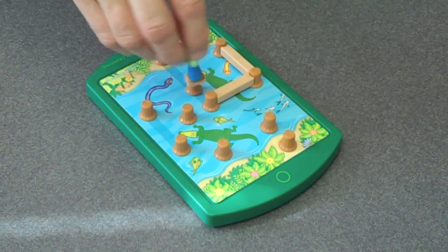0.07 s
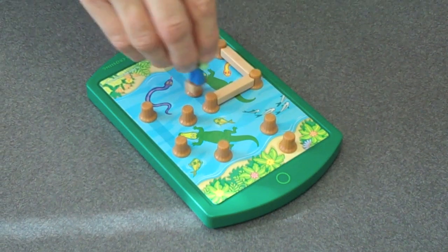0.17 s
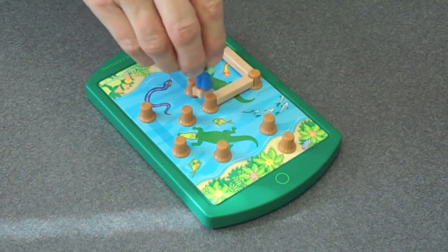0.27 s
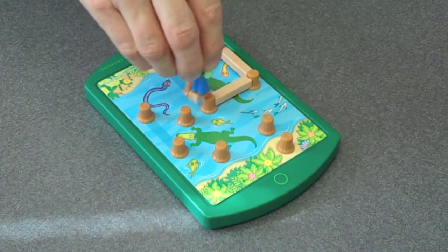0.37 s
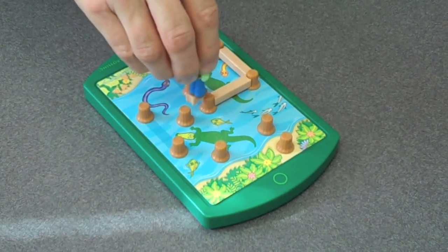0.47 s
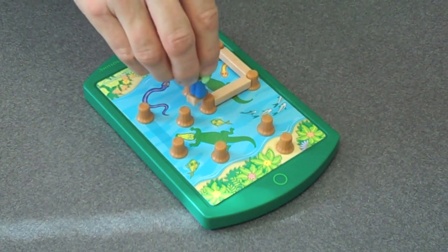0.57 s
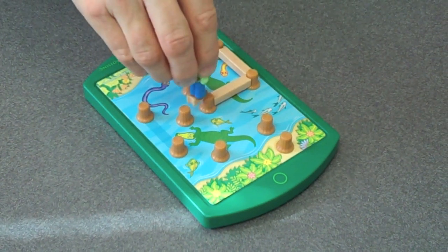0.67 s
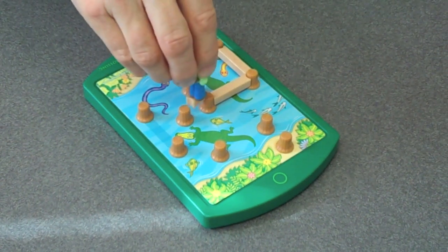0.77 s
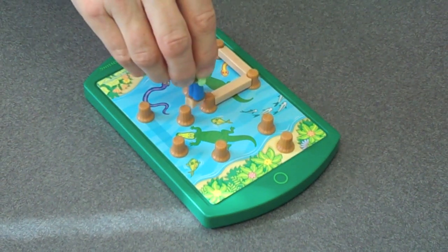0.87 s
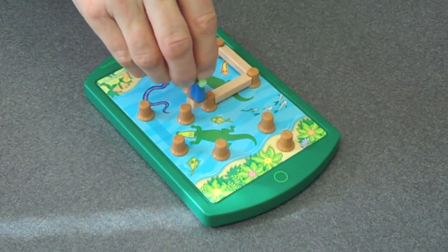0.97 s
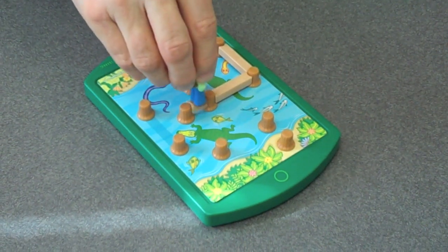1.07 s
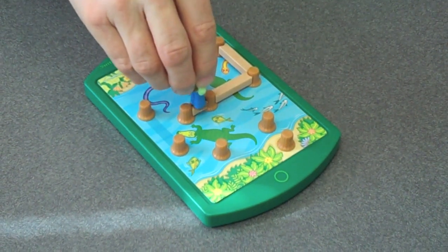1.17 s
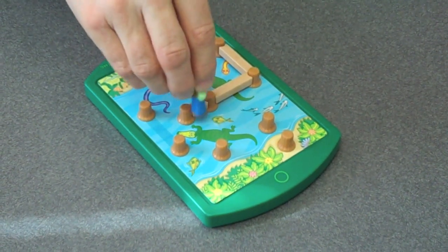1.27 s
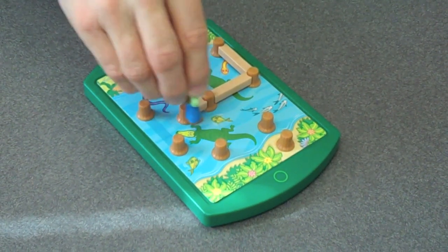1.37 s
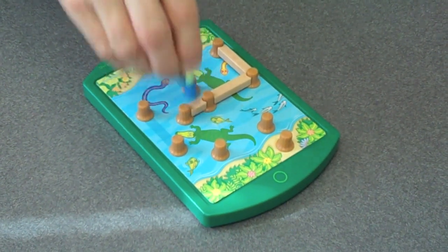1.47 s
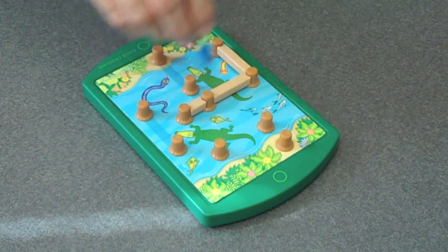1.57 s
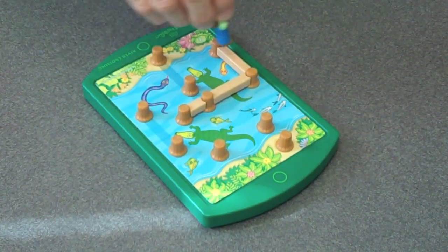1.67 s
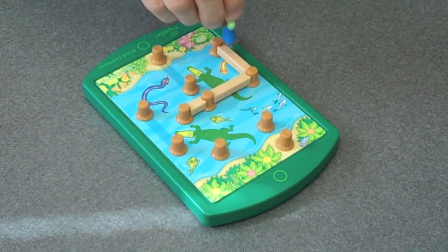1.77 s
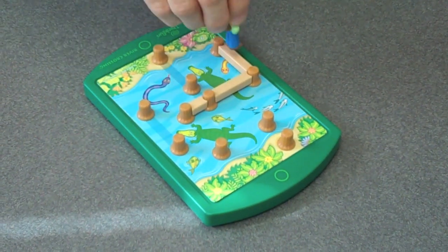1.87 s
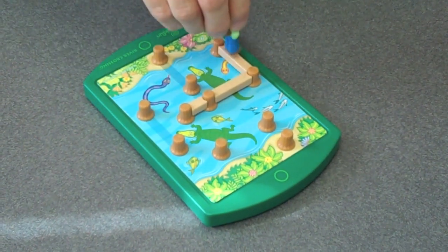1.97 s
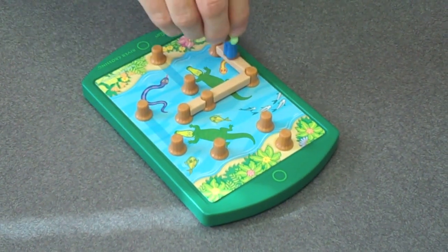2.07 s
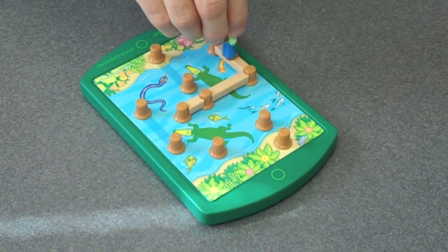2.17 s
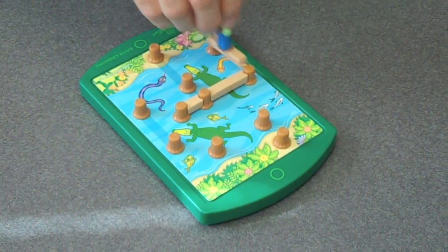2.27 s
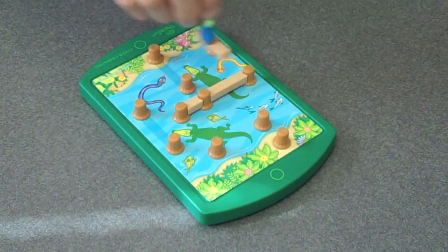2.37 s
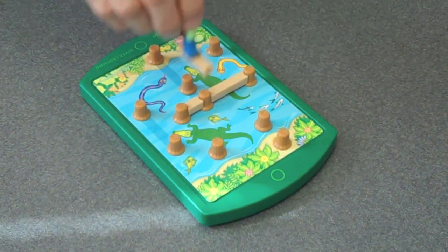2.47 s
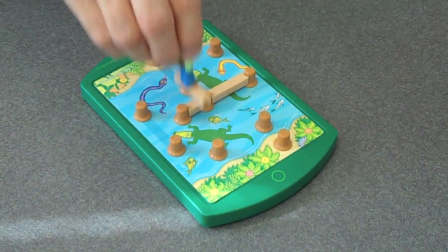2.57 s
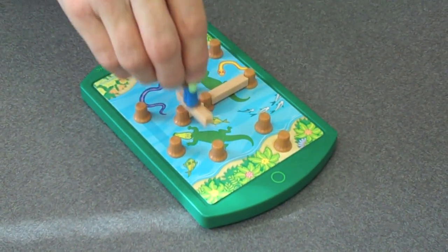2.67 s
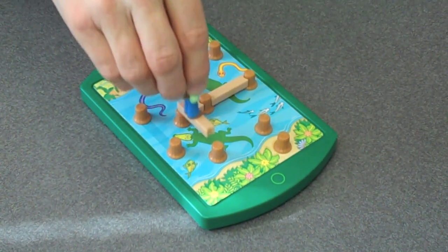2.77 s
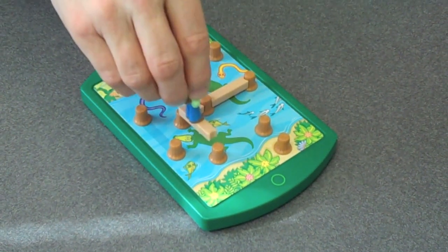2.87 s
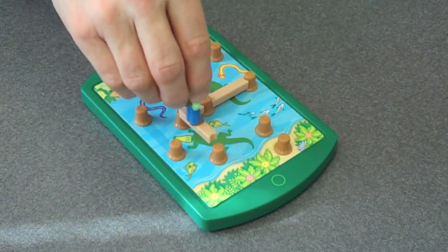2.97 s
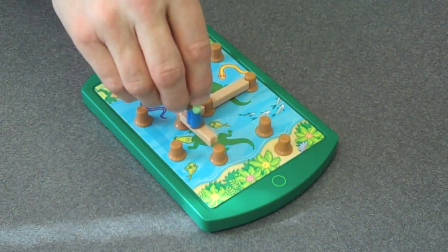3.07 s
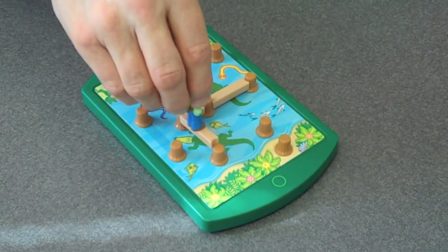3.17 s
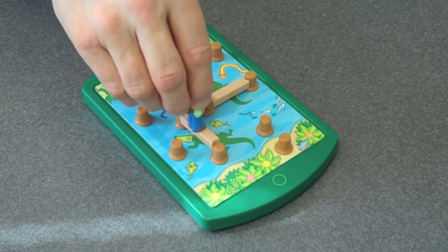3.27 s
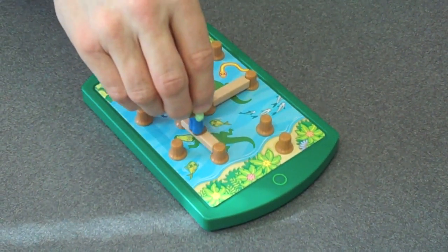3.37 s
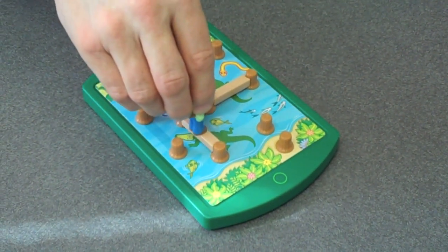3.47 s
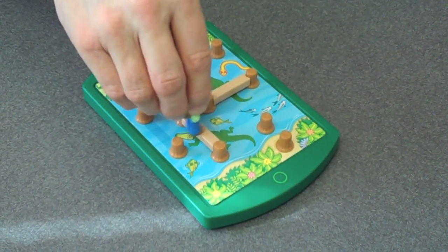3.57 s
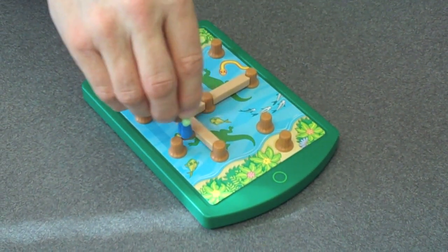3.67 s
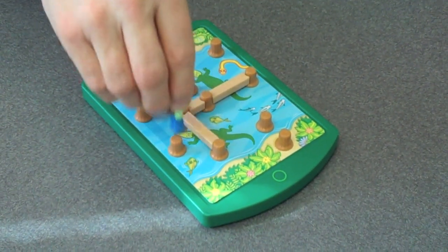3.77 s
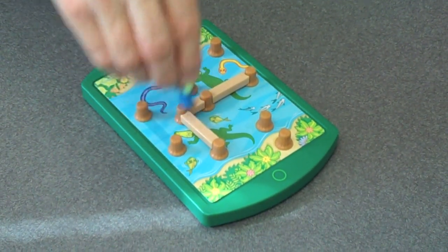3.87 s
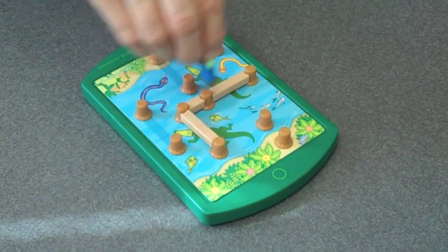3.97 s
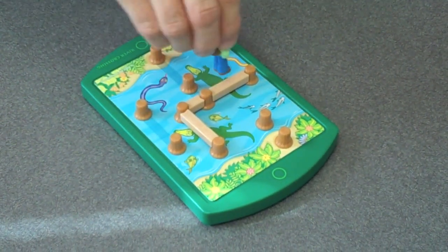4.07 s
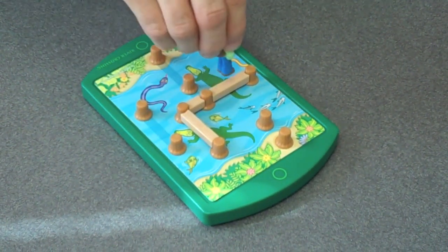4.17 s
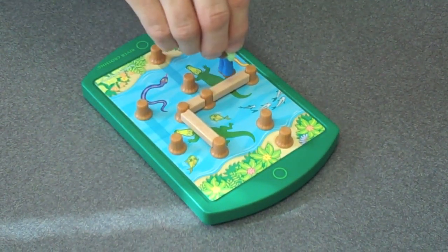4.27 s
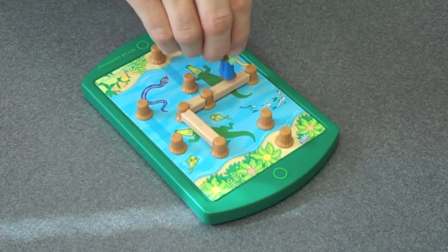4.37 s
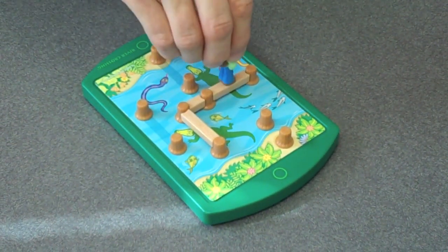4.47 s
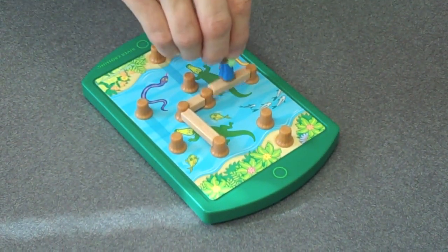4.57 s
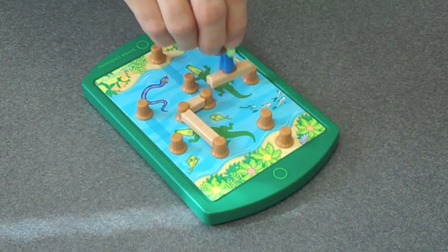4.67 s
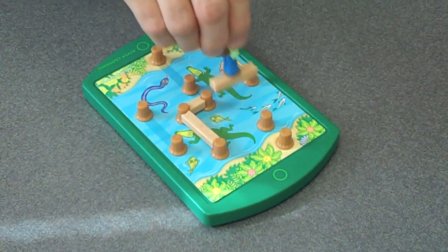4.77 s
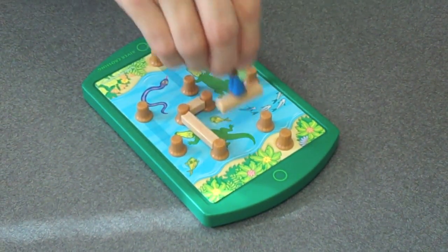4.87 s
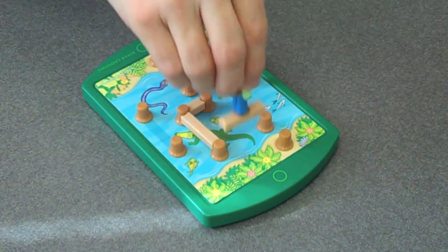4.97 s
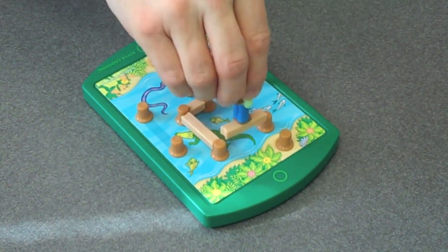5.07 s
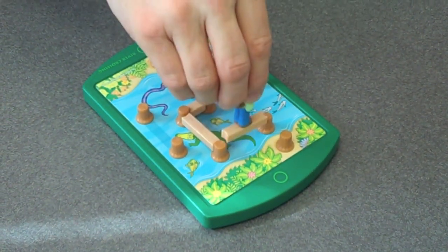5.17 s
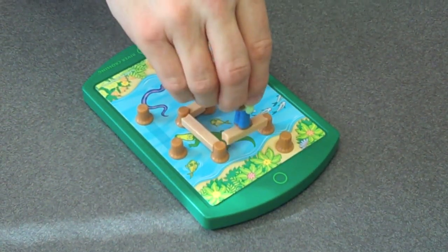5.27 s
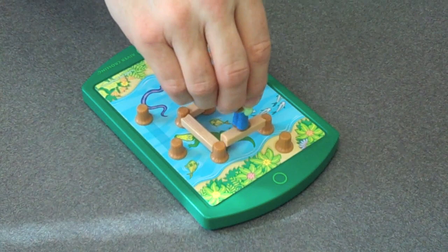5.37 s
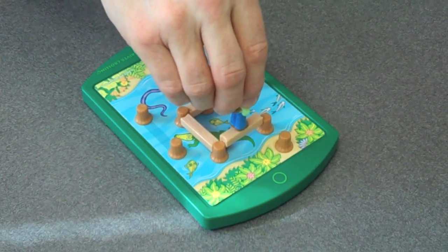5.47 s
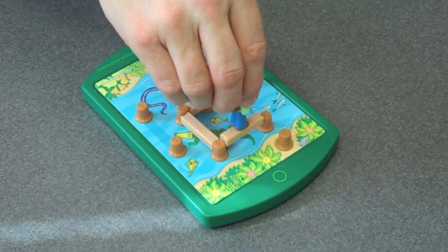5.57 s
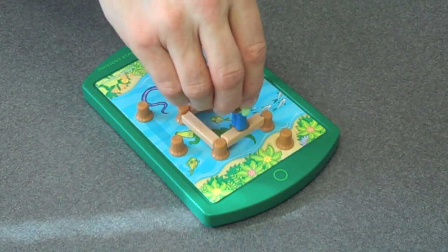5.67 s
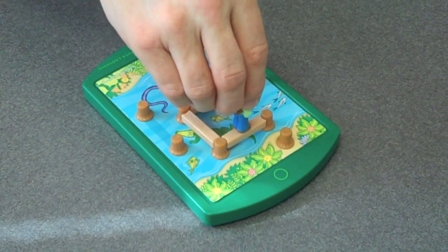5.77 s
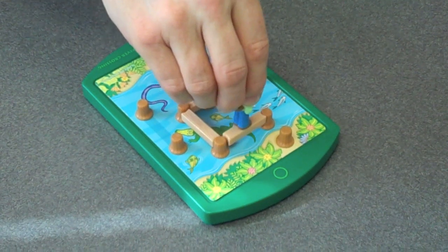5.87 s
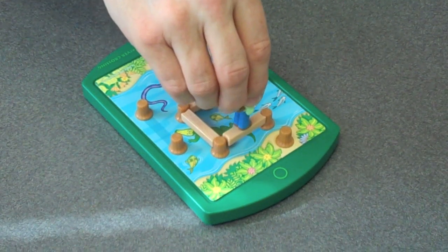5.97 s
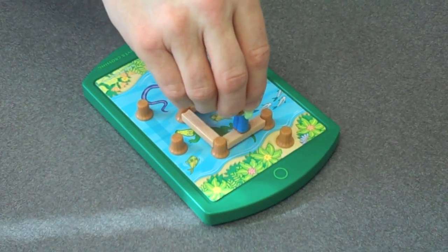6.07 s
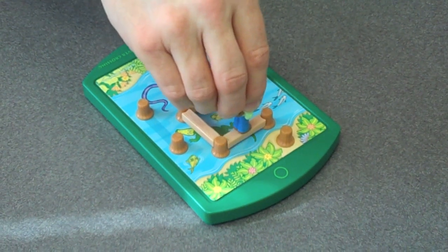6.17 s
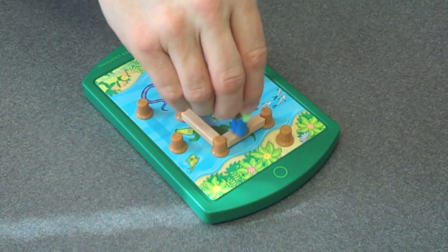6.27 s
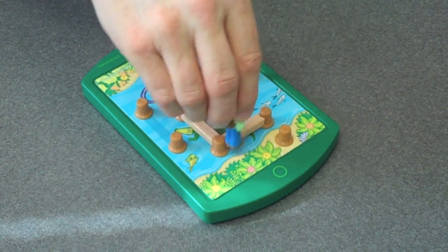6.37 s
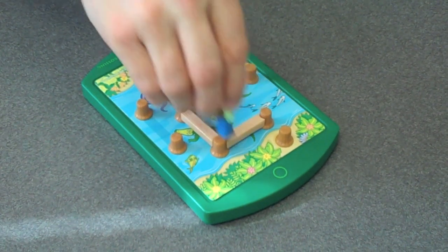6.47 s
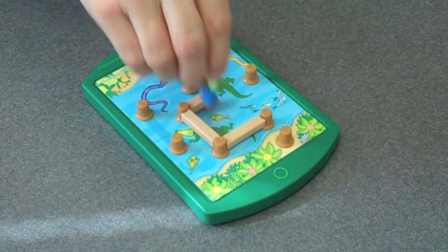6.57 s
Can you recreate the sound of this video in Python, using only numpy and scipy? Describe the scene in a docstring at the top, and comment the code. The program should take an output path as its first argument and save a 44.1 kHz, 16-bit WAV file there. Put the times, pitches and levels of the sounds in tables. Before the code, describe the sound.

A quiet room with a soft, steady ventilation-like rumble, low droning and faint hiss; a close stereo microphone hears a small hollow plastic board. Very faint rubbing begins around 0.5 s, then a crisp click at 1.07 s and a scrapy knock at 1.23 s with tiny trailing ticks. At 2.02 s a loud, hard snap cracks with rapid chatter and a bright, very high ring that dies almost at once; a short scrape and clustered clacks follow at 2.2 s. Light rubs start near 3.15 s, leading to hollow double knocks at 3.55-3.6 s and a smaller one at 3.7 s. A second bright snap strikes at 4.4 s, then a dull scrape and tap at 4.55 s. A light tap comes at 5.34 s, faint rubs and ticks from 5.7 to 6.1 s, and firmer clicks around 6.26-6.3 s, leaving only room noise.

```python
"""Plastic plank puzzle

A hand moves little plastic planks between the pegs of a hollow plastic puzzle board in a quiet room.
Planks rub along the pegs as trains of tiny slips that drive the board's modes, with fine friction on top.
They knock into their seats as damped board modes plus edge clicks of filtered noise.
Twice one snaps up against the playing figure: noise cracks, board knocks and a bright ring of close modes.
Shaped noise lies underneath as a soft ventilation-like rumble with droning resonances and a faint hiss."""
import sys
import numpy as np
from scipy import signal
from scipy.fft import rfft, irfft, next_fast_len
from scipy.io import wavfile
from scipy.ndimage import uniform_filter1d, minimum_filter1d

SR = 44100
rng = np.random.default_rng(int(sys.argv[2]) if len(sys.argv) > 2 else 0)


def transcribe(u):
    """Save the signal u as a 16-bit wav file named by the first command-line argument.

    u: samples, shape (n,) or (channels, n), limited to [-1, 1]; the rate is SR.
    q: integer samples, one column per channel.
    """
    v = np.clip(np.atleast_2d(u).T, -1, 1)
    q = np.round(v * 32767).astype(np.int16)
    wavfile.write(sys.argv[1], SR, q)


N = 292383

# All levels in the tables are relative, before the layer gains.
# Background noise colours: (f/Hz, level per Hz/dB)
RUMBLE = [(12, -30), (20, 2.5), (41, -2.5), (60, -15.5), (75, -11), (108, 0), (168, -6), (233, -4),
          (329, -9.5), (400, -0.5), (456, -8.5), (487, -10), (612, -13), (653, -12.5), (1000, -13),
          (1300, -45.5), (2200, -120)]
HISS = [(590, -33), (1000, -5.5), (1120, -4.5), (1150, -2.5), (1590, -8), (1880, -7), (2210, -9),
        (2530, -7), (3370, -12), (5600, -11), (7300, -6.5), (8420, -15.5), (14000, -17)]
# Droning resonances in the rumble: (f/Hz, width/Hz, level/dB)
DRONE = [(30, 10, -70.5), (115.9, 30, -72.5), (194.6, 33, -69), (231.5, 16, -69), (410, 32, -74)]
# Background stereo image: (f/Hz, left-right likeness, below 0 taken as 0) and (f/Hz, left over right/dB)
LIKENESS = [(60, 0.97), (130, 0.9), (290, 0.84), (640, 0.75), (1400, 0.36), (3080, -0.13), (6780, -0.16),
            (14900, 0.08)]
LEAN = [(60, -12), (130, -1.5), (290, -1.5), (640, 2), (1400, 2.5), (3080, 0), (6780, 1), (14900, 0.5)]
# Hollow board with its pegs, the panel's own mode first: (f/Hz, level/dB, t60/s)
BOARD = [(1103, -10, .06), (630, -24.5, 0.0073), (800, -19.5, .02), (1189, -16, .018), (1560, -17, .018),
         (1651.5, -12.5, 0.02507), (1815, -12, 0.01577), (1960, -12.5, .04), (2120, -10.5, 0.019),
         (2310, -8.5, 0.019), (2601, -9, 0.015), (2790, -7, 0.017), (2984, -5.5, 0.017), (3126, -13, 0.022),
         (3292, -15, 0.016), (3463, -11.5, .022), (3680, -16, 0.022), (4560, -18, 0.0178)]
# Rubs along a peg, each at a spot that sets how the board answers: (t of the hardest push/s, rub level/dB,
# swell/s, release/s, squeaky top/dB, hollow panel/dB, board tilt/dB per octave, favoured f/Hz)
STROKES = [ (0.61, -64, 0.14, .05, -12, -3, 0.5, 2140), (0.72, -62.5, .05, 0.037, -2, -4, -8, 2800),
           (0.92, -59.5, 0.045, 0.015, -17, 5, 3, 3000), (1.074, -50, .03, 0.063, 0, -7, -6, 1720),
           (1.186, -57, 0.015, 0.03, -16, 8, -15, 3000), (1.234, -37.5, 0.039, 0.034, -9, -0.5, -2.5, 3000),
           (2.02, -39, 0.011, .005, -12, -12, 3.5, 2550), (2.209, -33, 0.05, 0.032, -16, -10, 1.5, 1900),
           (3.166, -51.5, 0.014, 0.014, -10, -14, -4, 2900), (3.295, -52, 0.11, 0.045, -8, 1.5, -2, 3060),
           (3.352, -55.5, 0.057, .035, 5, 7, -8, 1650), (3.545, -46.5, 0.0099, 0.078, -7, 1, 4.5, 2830),
           (3.593, -45.5, 0.06, 0.045, 1.5, 2.5, 0, 3100), (3.706, -49.5, 0.024, 0.038, 2, -10, -5, 1660),
           (4.396, -32, .012, 0.024, -3, -19, 3.5, 1750), (4.568, -35.5, 0.021, 0.027, -15, -9, 4, 1950),
           (5.346, -53.5, 0.012, .045, -5, -18, -1.5, 2390), (5.725, -60, 0.045, 0.027, -13, -4, -3, 2395),
           (5.825, -61.5, 0.048, 0.053, -12, -4, -1.5, 2220), (5.98, -54, 0.054, 0.064, -1.5, 1.5, 0, 2240),
           (6.06, -57.5, 0.042, 0.048, 8.5, -3.5, -1.5, 2820), (6.205, -60, 0.059, .1, -5, 7, -1.5, 2900),
           (6.267, -41, 0.0085, 0.02, -6.5, -6, -3, 1590), (6.297, -41, 0.042, 0.03, -10, -4.5, -10, 1650)]
# Fine friction of the edges: (f/Hz, level per Hz/dB)
FRICTION = [(500, 0.5), (2000, -1.5), (3700, -2.5), (4500, -3.5), (5100, -7.5), (6000, 3), (6800, -5.5),
            (7900, 2), (8400, -7), (9100, -14.5), (9800, -9.5), (11000, -37), (14000, -26.5)]
# Room tail: (f/Hz, t60/s) and (f/Hz, reflected level/dB)
ROOM_T60 = [(500, 0.34), (2000, 0.2), (4000, 0.26), (6000, 0.3159), (8000, 0.3969), (10000, 0.31),
            (14000, 0.26)]
ROOM_COLOUR = [(500, 10), (1200, 7.5), (2000, 9), (3200, 3.5), (4300, 2), (6000, -1), (8000, -5.5),
               (9000, -7), (14000, -16.5)]
# Plank touches peg or board: (t/s, board knock/dB, edge click/dB, click centre f/Hz)
CONTACTS = [ (0.542, -41.5, -53.5, 4960), (1.059, -55, -51, 4400), (1.073, -35, -27, 4970),
            (1.232, -32, -39.5, 5200), (1.241, -44, -42.5, 5700), (1.299, -56, -49.5, 6500),
            (1.339, -62, -57.5, 7000), (2.188, -34.5, -54, 6000), (2.201, -29.5, -43, 6000),
            (2.2197, -34.5, -30.5, 5740), (3.164, -54, -67.5, 6000), (3.338, -58, -44, 6900),
            (3.5455, -27.5, -40.5, 7000), (3.570, -35, -53, 5540), (3.582, -33.5, -47, 6500),
            (3.594, -35.5, -29, 6000), (3.695, -42, -50, 6000), (3.703, -36, -47, 5570),
            (3.758, -54, -44, 7300), (4.388, -26.5, -32, 6000), (4.54, -48, -65, 6000),
            (4.5541, -36, -60, 6100), (4.566, -53, -54, 5860), (5.277, -55.5, -72, 5000),
            (5.3392, -38, -48, 5500), (5.803, -46, -66, 4970), (5.972, -49, -56, 6000),
            (6.038, -44, -62, 6000), (6.055, -50, -38.5, 6460), (6.067, -43, -38, 6650),
            (6.262, -33.5, -33, 7300), (6.285, -35.5, -44, 7080), (6.299, -43, -52, 5500),
            (6.354, -58, -55.5, 6560)]
# Plank snaps against the figure and chatters: (t/s, ring/dB, ring f/Hz, chatter/s, crack/dB, board knock/dB)
SNAPS = [(2.0218, -14.5, 8033, .0145, -12.5, -21.5), (4.3955, -12.5, 7835, 0.0095, -13, -24.5)]
# Hits of every snap, first touch to last rebound: (t after the first touch/s, crack and knock level/dB)
CHATTER = [(0, -7.5), (.0022, 1.5), (.0062, -12), (0.0133, -18)]
# Close modes of the bright ring, beating together: (offset from the ring f/Hz, level/dB, left over right/dB)
RING_MODES = [(0.5, -1, 17), (-150, -10.5, 7), (-380, -13, 15), (120.5, -12, 15)]
# Dense, quickly damped modes of plank and figure: (f/Hz, level per Hz/dB)
CRACK = [(100, -51.5), (400, -39.5), (1200, -29), (1800, -21.5), (2600, -12), (4200, -13), (5000, -7),
         (5600, -2), (6400, 6), (7100, 2.5), (7900, 2.5), (8500, -5.5), (9750, -6.5), (10500, -31.5),
         (14000, -34)]
# Lingering modes of the small hard pieces: (f/Hz, level/dB, t60/s)
PIECE = [(2477, -35.5, 0.1), (2830, -47, .12), (5370, -37, 0.164), (5900, -36, 0.14), (6050, -36, 0.1156),
         (6860, -27.5, 0.21), (6780, -35, 0.13), (7236, -36.5, .12), (7300, -35, .2), (8150, -31.5, 0.0582),
         (9740, -23.5, 0.09)]

TIME = np.arange(N) / SR
HIT = TIME[:6000]   # time axis of one hit
PADDED = next_fast_len(N, True)
SIDES = np.array([[1], [-1]])   # left, right
SWELL_DB, RELEASE_DB = 22, 21.5   # growth of the rub over the swell time, and its fall over the release time
SHARPEN_DB_PER_S = 36   # the squeak grows as the plank's edge slides home
FAVOUR_DB, FAVOUR_OCTAVES = 6, 0.081   # lift of the modes near the favoured pitch, and its reach
# The bright ring sags while the plank chatters, drops as it settles, then dies freely
RING_SAG_DB_PER_S, SETTLE_S, SETTLE_DB, RING_T60_S = 330.5, 0.0013, 9.5, 0.077
CEILING, CUTOFF_HZ = 0.63, 14400   # limiter ceiling (full scale is 1), and top of the final low-pass


def from_db(db):
    """Decibels to gain."""
    return np.exp(np.asarray(db) * np.log(10) / 20)


def rms_one(x):
    """Scale to unit rms."""
    return x / np.sqrt(np.mean(x ** 2) + 1e-20)


def at_hz(points, hz):
    """Read a table on a log-frequency axis."""
    f, value = np.transpose(points)
    return np.interp(np.log(np.maximum(hz, 1)), np.log(f), value)


def pan(db):
    """Left and right gains for a level difference, with a mean of one."""
    gains = from_db(SIDES * db / 2)
    return gains / gains.mean(axis=0)


def coloured(x, spectrum):
    """Give a noise a spectrum; rms 1."""
    size = next_fast_len(x.shape[-1], True)
    gain = from_db(at_hz(spectrum, np.fft.rfftfreq(size, 1 / SR)))
    shaped = irfft(rfft(x, size) * gain, size)
    return rms_one(shaped[..., :x.shape[-1]])


def resonate(x, hz, width_hz):
    """One two-pole resonance; the wider it is, the faster it dies."""
    r = np.exp(-np.pi * width_hz / SR)   # pole radius
    poles = [1, -2 * r * np.cos(2 * np.pi * hz / SR), r * r]
    return signal.lfilter([1, 0, -1], poles, x) * (1 - r * r) / 2


def low_cut(x, lowest_hz):
    """A small body radiates little bass."""
    return signal.sosfilt(signal.butter(2, lowest_hz, "high", fs=SR, output="sos"), x)


def dying(t60):
    """Envelope of a free vibration."""
    return from_db(-60 * HIT / t60)


def add(track, s, sound):
    """Mix a sound in at a time."""
    start = round(s * SR)
    track[..., start:start + sound.shape[-1]] += sound[..., :N - start]


def wide_noise(width):
    """A short stereo noise, partly different in each ear."""
    mid, side = rng.standard_normal((2, len(HIT)))
    return mid + width * side * SIDES


def background(spectrum):
    """Steady stereo noise, most alike in both ears in the bass; rms 1."""
    hz = np.fft.rfftfreq(PADDED, 1 / SR)
    alike = np.clip(at_hz(LIKENESS, hz), 0, 1)
    mid, side = rfft(rng.standard_normal((2, PADDED)))
    pair = np.sqrt(1 + alike) * mid + np.sqrt(1 - alike) * side * SIDES
    shaped = pair * pan(at_hz(LEAN, hz)) * from_db(at_hz(spectrum, hz))
    return rms_one(irfft(shaped, PADDED)[:, :N])


def ambience(rumble_db=-62.0, hiss_db=-66.5):
    """Low rumble with a few droning resonances excited by noise, and hiss."""
    drone = 0
    for hz, width_hz, db in DRONE:
        drone = drone + from_db(db) * rms_one(resonate(rng.standard_normal(N), hz, width_hz))
    return from_db(rumble_db) * background(RUMBLE) + from_db(hiss_db) * background(HISS) + drone


def board_modes(lowest_hz=600, contact_s=0.00058):
    """The board's modes swell over the contact time; so small a body radiates little bass."""
    hz, level_db, t60 = np.transpose(BOARD)[:, :, None]
    onset = 1 - np.exp(-HIT / contact_s)
    vibration = np.exp(2j * np.pi * hz * HIT)   # complex, so that each knock can set its phases
    return low_cut(from_db(level_db) * dying(t60) * onset * vibration, lowest_hz)


def knock(modes, s, spread_db=1.3, level_db=0.93):
    """The board rings as it does at the spot of the stroke nearest in time; each spot favours other modes."""
    *_, panel_db, tilt, favoured_hz = min(STROKES, key=lambda stroke: abs(stroke[0] - s))
    hz = np.array(BOARD)[:, 0]
    favour = np.exp(-(np.log2(hz / favoured_hz) / FAVOUR_OCTAVES) ** 2)
    panel = panel_db * (hz == hz[0])
    spot_db = panel + tilt * np.log2(hz / np.median(hz)) + FAVOUR_DB * favour
    strength = from_db(level_db + spot_db + spread_db * rng.standard_normal(len(hz)))
    phase = np.exp(2j * np.pi * rng.random(len(hz)))
    return np.real(strength * phase @ modes)


def scrapes(modes, slips_per_s=2500, uneven_db=3.5, rub_db=-4.0, top_db=-4.0):
    """Each stroke swells and lets go: dense tiny slips drive the board's modes, with fine friction on top."""
    sizes = from_db(uneven_db * np.minimum(rng.exponential(1, N), 4)) * rng.choice([-1, 1], N)
    slips = rms_one(sizes * (rng.random(N) < slips_per_s / SR))
    body, top = np.zeros((2, N))
    for s, level_db, swell_s, release_s, bright_db, *_ in STROKES:
        start = s - 2 * swell_s
        during = slice(round(start * SR), round((s + 2 * release_s) * SR))
        t = TIME[during] - s   # zero at the hardest push
        push_db = np.minimum(SWELL_DB * t / swell_s, -RELEASE_DB * t / release_s)
        force = from_db(level_db + push_db)
        board = knock(modes, s, spread_db=0.5)
        add(body, start, signal.fftconvolve(slips[during] * force, board / np.linalg.norm(board)))
        top[during] += force * from_db(bright_db + SHARPEN_DB_PER_S * t)
    return from_db(rub_db) * body + from_db(top_db) * top * coloured(slips, FRICTION)


def room(x, wet_db=-12.0, first_s=0.0063, width=0.7):
    """Reflections from nearby walls merge into a short tail, dying band by band."""
    t = TIME[:SR // 3]
    mid, side = rng.standard_normal((2, len(t)))
    noise = mid + width * side * SIDES
    edges = np.geomspace(300, 15000, 15)   # band edges in Hz
    tail = 0
    for low, high in zip(edges, edges[1:]):
        hz = np.sqrt(low * high)
        band = signal.sosfilt(signal.butter(2, [low, high], "band", fs=SR, output="sos"), noise)
        decay = np.exp(-np.log(1000) * t / at_hz(ROOM_T60, hz))
        tail = tail + band * from_db(at_hz(ROOM_COLOUR, hz)) * decay
    tail = tail * (t > first_s)   # silent until the first reflection
    return from_db(wet_db) * signal.oaconvolve(x, tail / np.linalg.norm(tail), axes=1)[:, :N]


def burst(noise, t60):
    """Many close modes dying together, with a set energy."""
    envelope = dying(t60)
    return rms_one(noise * envelope) * np.sqrt(np.mean(envelope ** 2))


def contacts(modes, click_t60=0.022, click_width_hz=2200, click_pan_db=2.5, width=0.67):
    """Each touch knocks the board and makes the plank's edge click."""
    out = np.zeros((2, N))
    edges = coloured(np.array([wide_noise(width) for _ in CONTACTS]), FRICTION)
    for (s, knock_db, click_db, hz), edge in zip(CONTACTS, edges):
        click = burst(resonate(edge, hz, click_width_hz), click_t60) * pan(click_pan_db)
        add(out, s, from_db(knock_db) * knock(modes, s) + from_db(click_db) * click)
    return out


def ringing(modes):
    """The free ring of each mode, one a row."""
    hz, level_db, t60 = np.transpose(modes)[:, :, None]
    return from_db(level_db) * dying(t60) * np.sin(2 * np.pi * hz * HIT)


def bright_ring(hz, chatter_s):
    """A cluster of close modes of the figure: sagging under the chatter, settling, dying."""
    settled = np.clip((HIT - chatter_s) / SETTLE_S, 0, 1)
    envelope = from_db(-RING_SAG_DB_PER_S * np.minimum(HIT, chatter_s) - SETTLE_DB * settled)
    envelope = envelope * np.exp(-np.log(1000) * np.maximum(HIT - chatter_s, 0) / RING_T60_S)
    cluster = 0
    for offset_hz, db, pan_db in RING_MODES:
        cycles = (hz + offset_hz) * HIT + rng.random()
        cluster = cluster + from_db(db) * pan(pan_db) * np.sin(2 * np.pi * cycles)
    return envelope * cluster


def snaps(modes, crack_t60=0.024, crack_pan_db=0.5, width=0.44, piece_pan_db=3.0, knock_pan_db=-0.5,
          lowest_hz=1400):
    """Hard hits: a crack, the sharp ring of the small pieces and a knock from the board."""
    out, piece = np.zeros((2, N)), ringing(PIECE)
    for s, ring_db, hz, chatter_s, crack_db, knock_db in SNAPS:
        add(out, s, low_cut(from_db(ring_db) * bright_ring(hz, chatter_s), lowest_hz))
        for delay, hit_db in CHATTER:
            crack = burst(coloured(wide_noise(width), CRACK), crack_t60) * pan(crack_pan_db)
            # every piece mode starts with a random polarity
            linger = rng.choice([-1, 1], len(piece)) @ piece * pan(piece_pan_db)
            add(out, s + delay, low_cut(from_db(crack_db + hit_db) * (crack + linger), lowest_hz))
            add(out, s + delay, from_db(knock_db + hit_db) * knock(modes, s) * pan(knock_pan_db))
    return out


def scene():
    """The puzzle in its room."""
    modes = board_modes()
    puzzle = scrapes(modes) + contacts(modes) + snaps(modes)
    return ambience() + puzzle + room(puzzle)


def record(dry, hold_s=0.00076):
    """A fast limiter holds the loudest peaks; the top is cut."""
    size = max(int(hold_s * SR), 1)
    gain = CEILING / np.maximum(np.abs(dry).max(axis=0), CEILING)
    limited = dry * uniform_filter1d(minimum_filter1d(gain, size), size)
    return signal.sosfilt(signal.ellip(10, 0.1, 70, CUTOFF_HZ, fs=SR, output="sos"), limited)


dry = scene()
out = record(dry)
transcribe(out)
```